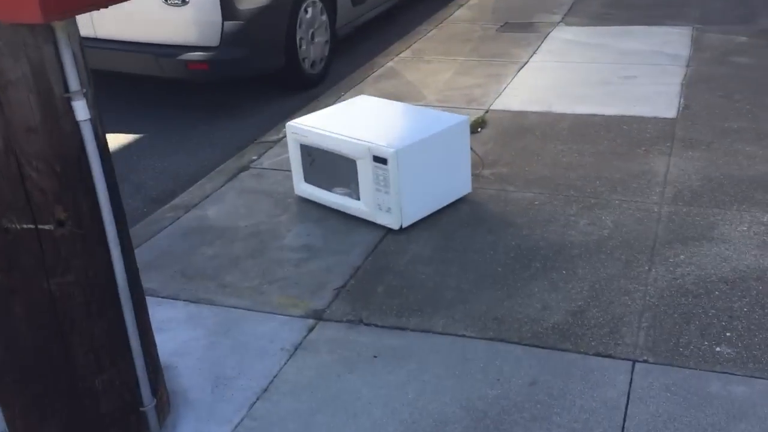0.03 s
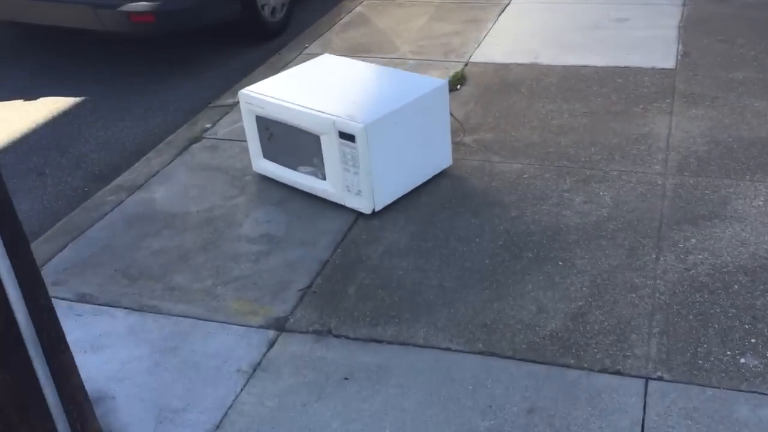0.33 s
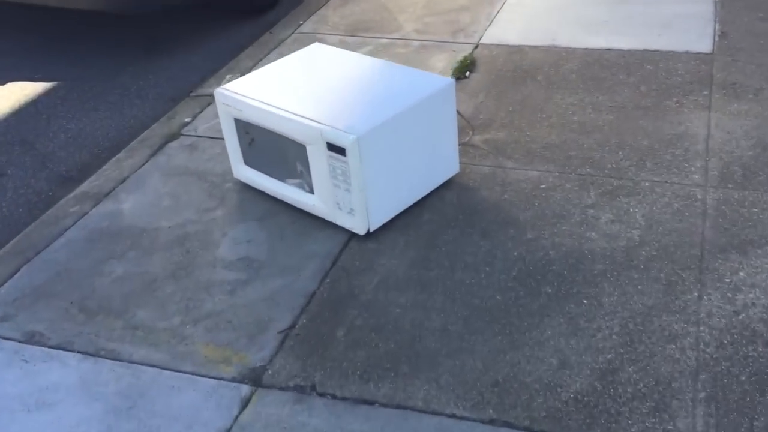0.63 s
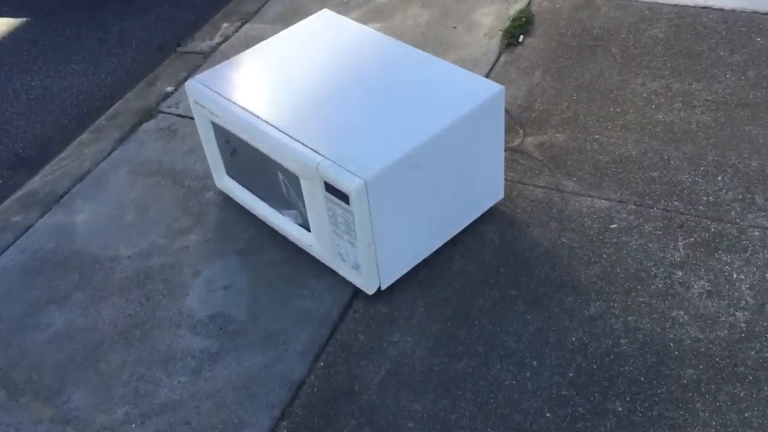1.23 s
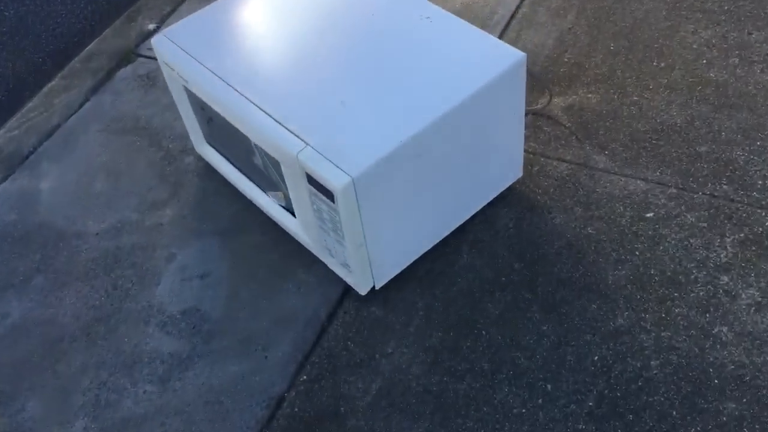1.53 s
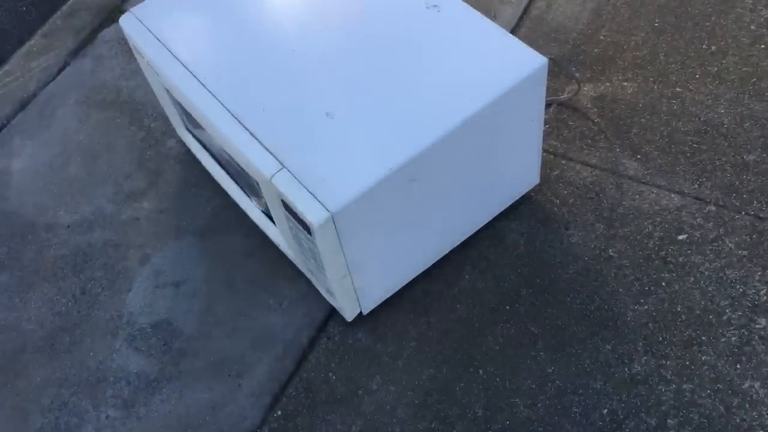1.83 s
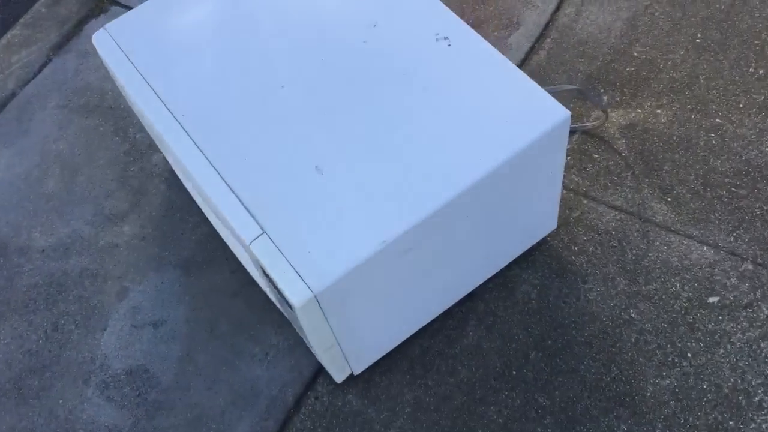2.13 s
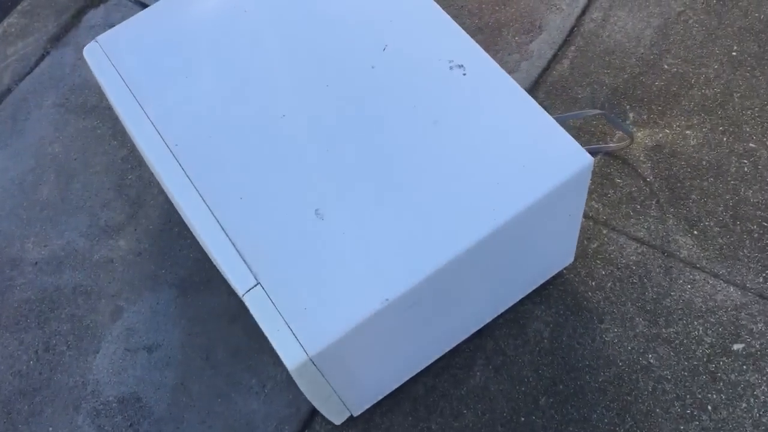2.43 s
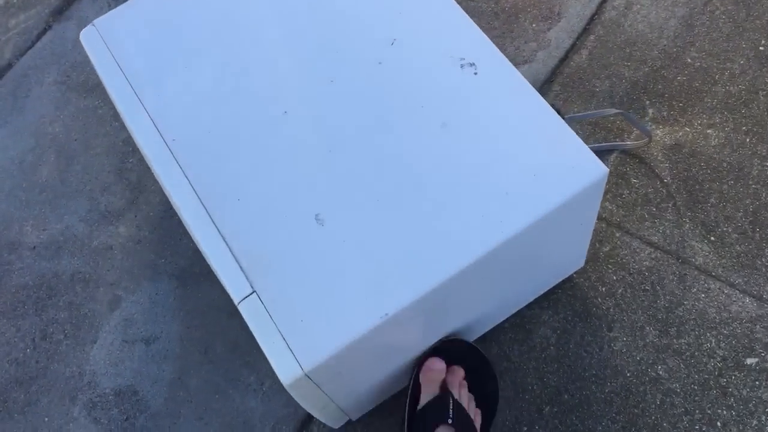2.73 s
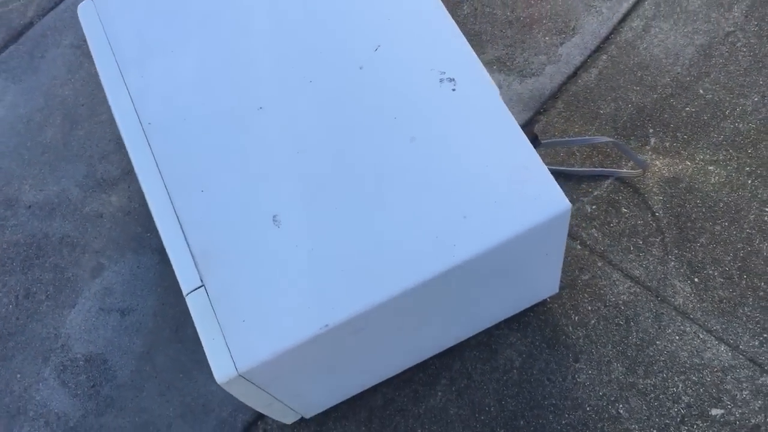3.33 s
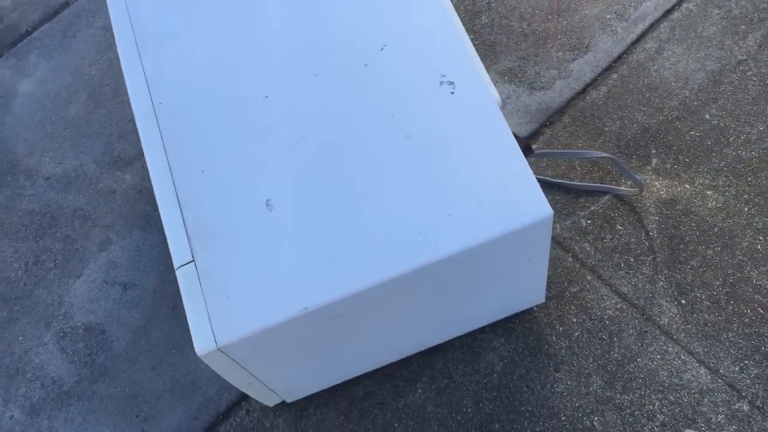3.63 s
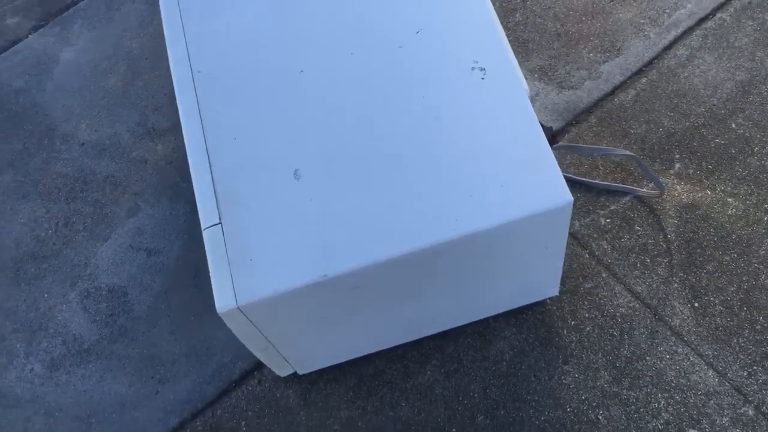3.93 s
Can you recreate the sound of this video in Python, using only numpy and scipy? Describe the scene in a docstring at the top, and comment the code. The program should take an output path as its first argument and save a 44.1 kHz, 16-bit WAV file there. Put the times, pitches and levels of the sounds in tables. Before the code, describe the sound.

Flip-flop footsteps on a sidewalk, then a kick that makes a microwave oven boom and rattle.

```python
"""Flip-flops and a kicked microwave

Someone in flip-flops walks up a concrete sidewalk while distant traffic rumbles. At each step
a rubber sole scuffs the ground and slaps the heel. Then they kick a discarded microwave oven:
its sheet-metal case booms, rattles and is shoved a little way. A few ticks follow, two of
them sharp, likely grit snapping underfoot."""
import sys
import numpy as np
from scipy import signal
from scipy.fft import rfft, irfft
from scipy.io import wavfile

SR = 44100
rng = np.random.default_rng(int(sys.argv[2]) if len(sys.argv) > 2 else 0)


def generate_wav(sig):
    """Save sig (samples, or channels by samples) to the path in sys.argv[1] as 16-bit PCM at SR."""
    pcm = np.round(np.clip(np.atleast_2d(sig).T, -1, 1) * 32767).astype(np.int16)
    wavfile.write(sys.argv[1], SR, pcm)


N = 176400
TIME = np.arange(N) / SR
FREQS_HZ = np.arange(N // 2 + 1) * SR / N


def from_db(db):
    """Turn decibels into a number to multiply by."""
    return 10 ** (np.asarray(db) / 20)


def unit_level(x):
    """Scale a signal so that its average strength (rms) is 1."""
    return x / np.sqrt(np.mean(x ** 2) + 1e-20)


def level(rows):
    """Loudness over time, gliding between rows of time_s, level_db."""
    return from_db(np.interp(TIME, *np.transpose(rows)))


def at_pitch(rows, hz):
    """Look up a pitch in a table, gliding between its rows octave by octave."""
    pitches, values = np.transpose(rows)
    return np.interp(np.log(hz + 1e-9), np.log(pitches), values)


def colour(x, tone, low_hz=0, high_hz=SR):
    """Make some pitches stronger than others and cut off both ends; the result has strength 1."""
    hz = FREQS_HZ + 1e-3
    edges = 1 / np.sqrt((1 + (low_hz / hz) ** 16) * (1 + (hz / high_hz) ** 16))
    return unit_level(irfft(rfft(x) * from_db(at_pitch(tone, hz)) * edges, N))


def grains(per_s=9000, spread_db=3):
    """Tiny random clicks of uneven size."""
    sizes = from_db(spread_db * np.minimum(rng.exponential(1, N), 4)) * rng.choice([-1, 1], N)
    return sizes * (rng.random(N) < per_s / SR)


def clicks(times_s, levels_db):
    """One click for each blow."""
    out = np.zeros(N)
    out[(np.array(times_s) * SR).astype(int)] = from_db(levels_db)
    return out


def ring(force, pitch_hz, fade_s):
    """Each click starts a pure tone. Here and below, fade_s is the time to fall by 60 dB."""
    decay, angle = from_db(-60 / (fade_s * SR)), 2 * np.pi * pitch_hz / SR
    return signal.lfilter([0, np.sin(angle)], [1, -2 * decay * np.cos(angle), decay ** 2], force + 1e-18)


def ring_all(force, tones):
    """A struck object rings with several tones at once, every second one flipped over."""
    return sum((-1) ** k * from_db(db) * ring(force, hz, fade_s)
               for k, (hz, db, fade_s) in enumerate(tones))


def burst(start_s, fade_s, rise_s=1 / SR):
    """Loudness that jumps up and dies away."""
    age = np.maximum(TIME - start_s, 0)
    return (1 - np.exp(-age / rise_s)) * from_db(-60 * np.minimum(age / fade_s, 4))


def wander(position, depth_db=2.6):
    """A gain that drifts to a new random value at each whole number of position."""
    points = rng.standard_normal(int(position[-1]) + 2)
    return from_db(depth_db * np.interp(position, np.arange(len(points)), points))


def uneven(x, spacing_hz=170):
    """No two scrapes are alike: each brings out slightly different pitches."""
    return irfft(rfft(x) * unit_level(wander(FREQS_HZ / spacing_hz)), N)


# Tone of the traffic's rumble, drone and tyre noise: pitch_hz, level_db
RUMBLE_TONE = [(20, -24), (31, -29.5), (44, 0.5), (72, 2.5), (110, 0.5), (165, -9.5), (205, -10),
               (275, -10.5), (330, -22), (420, -27)]
DRONE_TONE = [(330, -6), (450, -3), (560, 4.5), (800, -4.5), (1100, -6.5)]
TYRE_TONE = [(400, -15), (500, -13), (620, -1), (1000, 0.5), (1400, -0.5), (1750, -7), (2100, -12.5),
             (2500, -19), (3100, -23.5), (6000, -26), (15000, -31.5)]
# How loud each one is as time passes: time_s, level_db
RUMBLE_LOUDNESS = [(0, -42.5), (.26, -45), (.33, -49), (.65, -47.5), (.8, -45), (1.0, -44.5), (1.25, -43),
                   (2.0, -44), (2.7, -42.5), (3.3, -41.5), (4, -42.5)]
DRONE_LOUDNESS = [(0, -61), (.5, -62.5), (1.2, -64), (1.9, -63.5), (2.5, -77), (4, -72)]
TYRE_LOUDNESS = [(0, -57.5), (.7, -59), (1.4, -58.5), (2.2, -58.5), (2.7, -58.5), (3.4, -59), (4, -60)]


def traffic(split_hz=400, wavers_per_s=22):
    """Far traffic makes a low rumble, a drone that fades and a wavering wash of tyre noise."""
    rumble = colour(rng.standard_normal(N), RUMBLE_TONE, high_hz=split_hz)
    drone = colour(rng.standard_normal(N), DRONE_TONE, low_hz=305, high_hz=1110)
    spectrum = rfft(rng.standard_normal(N))
    edges_hz = np.geomspace(split_hz, 2600, 25)
    wash = irfft(spectrum * (FREQS_HZ >= edges_hz[-1]), N)  # the highs do not waver
    for low, high in zip(edges_hz, edges_hz[1:]):
        band = irfft(spectrum * ((FREQS_HZ >= low) & (FREQS_HZ < high)), N)
        wash += wander(TIME * wavers_per_s) * band
    tyres = colour(wash, TYRE_TONE)
    return level(RUMBLE_LOUDNESS) * rumble + level(DRONE_LOUDNESS) * drone + level(TYRE_LOUDNESS) * tyres


def street_echo(x, level_db=-20, dull_above_hz=4040):
    """House fronts and parked cars throw back faint, dull echoes."""
    dull = signal.butter(1, dull_above_hz, fs=SR, output="sos")
    echoes = signal.sosfilt(dull, grains(per_s=1500)) * burst(start_s=0.0035, fade_s=0.35)
    return from_db(level_db) * signal.fftconvolve(x, echoes / np.linalg.norm(echoes))[:N]


# Ticks, likely grit snapping underfoot: start_s, high_ring_db, low_ring_db, crunch_db
GRIT_TICKS = [(3.3245, -51, -66, -46), (3.6166, -47, -43.5, -33), (3.6745, -69, -64, -55.5),
              (3.9740, -17, -23.5, -27.5)]
# The high and the lower tones of a tick: pitch_hz, level_db, fade_s
TICK_HIGHS = [(6000, -15, .003), (11900, 2, 0.0025), (13600, -11, .002)]
TICK_LOWS = [(860, -10, .007), (1570, -5.5, 0.017), (2190, -4.5, 0.012), (4600, -4, 0.0048)]
# Tone of the crunch: pitch_hz, level_db
CRUNCH_TONE = [(500, -15), (3000, -6), (6000, 11), (10000, 5), (15500, -12)]


def ticks():
    """Tiny hard snaps ring for an instant and leave a faint spray of crumbs."""
    times_s, high_db, low_db, crunch_db = np.transpose(GRIT_TICKS)
    highs = ring_all(clicks(times_s, high_db), TICK_HIGHS)
    lows = ring_all(clicks(times_s, low_db), TICK_LOWS)
    crunch = 0
    for start_s, db in zip(times_s, crunch_db):
        snap = burst(start_s, fade_s=0.0034, rise_s=0.00022)
        spray = from_db(-26) * burst(start_s, fade_s=0.062)
        crunch += from_db(db) * (snap + spray)
    return highs + lows + crunch * colour(rng.standard_normal(N), CRUNCH_TONE)


# Rubber drags on concrete: peak_s, rise_s, fall_s, judder_db, rasp_db, hiss_db
SOLE_SCUFFS = [(0.027, .015, 0.012, -60, -58, -59.5), (0.058, 0.013, 0.025, -57.5, -65, -61),
               (0.538, 0.006, .016, -57, -56, -56.5), (0.565, .015, 0.061, -65, -72, -69),
               (1.123, 0.023, 0.016, -59, -56, -58.5), (1.152, 0.0075, 0.012, -68, -68, -65),
               (1.198, 0.021, 0.028, -79, -65.5, -68), (1.647, 0.011, 0.015, -45.5, -57, -53.5),
               (1.771, 0.019, 0.024, -72, -57, -70), (1.868, 0.033, 0.027, -68, -68, -73),
               (2.191, 0.0057, 0.014, -43, -52, -53.5), (2.225, 0.062, 0.048, -80, -65.5, -70),
               (2.314, 0.011, 0.015, -70, -61.5, -63), (2.378, 0.037, 0.027, -73, -63, -64.5),
               (2.386, 0.0043, 0.003, -54, -57, -52.5), (3.368, 0.013, 0.013, -62, -66, -66.5),
               (3.675, 0.089, 0.11, -83, -70.5, -95), (3.874, 0.051, .02, -65, -62, -67.5)]
# Tone of the juddering rubber, the sandy rasp and the fine hiss: pitch_hz, level_db
JUDDER_TONE = [(300, -38), (700, -8.5), (1000, -9.5), (1300, -6.5), (1580, 2.5), (2000, -2), (2650, -16.5),
               (3400, -6), (4600, -20), (15500, -43)]
RASP_TONE = [(500, -10), (1800, 5), (2700, -5.5), (3400, -3), (4100, 3), (4900, -7), (6200, -1),
             (8000, -15.5), (15500, -18)]
HISS_TONE = [(500, -25), (3000, -11), (6500, 1), (9300, 2.5), (10500, -7.5), (12500, 2), (15500, -3)]


def scuffs():
    """The sole sticks, slips and rasps over sand grains in short swells."""
    judder = colour(grains(), JUDDER_TONE)
    rasp = colour(grains(per_s=2300, spread_db=4), RASP_TONE)
    hiss = colour(grains(), HISS_TONE)
    out = 0
    for peak_s, rise_s, fall_s, judder_db, rasp_db, hiss_db in SOLE_SCUFFS:
        width_s = np.where(TIME < peak_s, rise_s, fall_s)
        swell = np.exp(-np.minimum(((TIME - peak_s) / width_s) ** 2, 20))
        sand = uneven(from_db(rasp_db) * rasp + from_db(hiss_db) * hiss)
        out += swell * (from_db(judder_db) * judder + sand)
    return out


# Weight lands on the pavement: start_s, level_db
STEP_THUDS = [(1.886, -38.5), (2.207, -30.5), (2.381, -39)]


def thuds():
    """The nearest steps land with a deep thud."""
    return ring(clicks(*np.transpose(STEP_THUDS)), pitch_hz=79, fade_s=0.19)


# A sole slaps the heel: start_s, air_db, air_hz, smack_db, smack_hz, crack_db, again_after_s, again_db
HEEL_SLAPS = [(0.1867, -43, 834, -35, 2400, -45.5, .0082, -2.5),
              (0.7495, -30, 830, -27.5, 1850, -42.5, 0.0042, -13),
              (1.3111, -36.5, 750, -38.5, 2100, -47, .0092, -9),
              (1.8746, -24, 1125, -32.5, 2110, -42, 0.00657, -13),
              (2.3823, -32, 650, -32.5, 1690, -46.5, 0.0032, -14)]
# Tone of the slap's crack: pitch_hz, level_db
SLAP_TONE = [(150, 6), (400, 11), (1000, 7.5), (2500, 0.5), (4000, -6.5), (6500, -11.5), (11000, -24),
             (15500, -24)]


def slaps():
    """Air pops out between heel and sole; the rubber smacks, then touches again more softly."""
    noise = colour(rng.standard_normal(N), SLAP_TONE, low_hz=120)
    out = 0
    for start_s, air_db, air_hz, smack_db, smack_hz, crack_db, again_after_s, again_db in HEEL_SLAPS:
        touches = clicks([start_s, start_s + again_after_s], [0, again_db])
        pop = from_db(air_db) * ring(touches, air_hz, fade_s=0.014)
        smack = from_db(smack_db) * ring(touches, smack_hz, fade_s=0.0063)
        crack = from_db(crack_db) * noise * burst(start_s, fade_s=0.07, rise_s=0.0005)
        out += pop - smack + crack
    return out


# How loud the sliding oven is: time_s, level_db
SHOVE_LOUDNESS = [(3.195, -77), (3.206, -55), (3.222, -46), (3.245, -48), (3.265, -43.5), (3.282, -52),
                  (3.292, -57.5), (3.32, -60), (3.345, -78)]
# Tone of its grinding: pitch_hz, level_db
SHOVE_TONE = [(200, 16.5), (500, -7), (1200, 2.5), (1700, 6.5), (2200, 5.5), (3200, 0), (3800, -6.5),
              (9000, -4.5), (10500, -7.5), (13000, -5), (15500, -9)]


def shove():
    """The oven's feet grind briefly over the concrete."""
    moving = (TIME > SHOVE_LOUDNESS[0][0]) & (TIME < SHOVE_LOUDNESS[-1][0])
    return moving * level(SHOVE_LOUDNESS) * uneven(colour(grains(), SHOVE_TONE, low_hz=120))


# Tone of the loose parts in the case: pitch_hz, level_db
RATTLE_TONE = [(100, 2.5), (200, 8), (285, 14), (370, -2.5), (480, 4), (680, -3), (1000, -1), (2000, 1),
               (2800, -8.5), (6500, -10), (9300, -13.5), (15500, -28)]
# How long they rattle at each pitch: pitch_hz, fade_s
RATTLE_FADES = [(150, 0.67), (300, 0.62), (600, 0.36), (1300, 0.3), (2500, 0.25), (5000, 0.19),
                (15000, 0.2)]


def rattle(start_s, rise_s):
    """Loose parts shake inside the case; the high pitches die away first."""
    parts = colour(grains(per_s=2500), RATTLE_TONE)
    out = 0
    for low_hz in 125 * 2 ** np.arange(7):
        octave = signal.butter(2, [low_hz, 2 * low_hz], "band", fs=SR, output="sos")
        fade_s = at_pitch(RATTLE_FADES, low_hz * np.sqrt(2))
        out += signal.sosfilt(octave, parts) * burst(start_s, fade_s, rise_s)
    return from_db(-27) * out


# The tones of the case's metal panels: pitch_hz, level_db, fade_s
PANEL_TONES = [(87.1, -26.5, 0.22), (127, -29, 0.16), (178, -39, 0.73), (243, -36.5, 0.79), (268, -44, 0.7),
               (297.5, -31, 0.37), (419, -56.5, 0.26), (549, -53, 0.28), (657, -40, 0.18),
               (1003, -52.5, 0.36), (1335, -46, 0.26), (1710, -53, 0.14), (1880, -39.5, 0.14),
               (2131, -37.5, 0.13)]
# Tone of the sole cracking against the case: pitch_hz, level_db
KICK_TONE = [(300, 15.5), (1000, -5), (2000, -2.5), (4000, -1.5), (7000, -4.5), (9300, 3), (10700, -5),
             (13000, 8), (15500, -4)]


def kick(start_s=2.8472, rise_s=0.0011):
    """The toe touches, then the sole cracks against the case: panels boom and loose parts rattle."""
    toe_s = start_s - 0.00492
    boom = ring_all(-clicks([toe_s, start_s], levels_db=[-12, 0]), PANEL_TONES)
    toe = from_db(-43) * burst(toe_s, fade_s=0.04, rise_s=rise_s)
    sole = from_db(-24) * burst(start_s, fade_s=0.034, rise_s=rise_s)
    crack = (toe + sole) * colour(grains(), KICK_TONE)
    return boom + crack + rattle(start_s, rise_s)


def scene():
    """The steps and the oven echo in the street; ticks and traffic join them in one channel."""
    near = slaps() + scuffs() + thuds() + kick() + shove()
    return (near + street_echo(near) + ticks() + traffic())[None]


def record(dry, cutoff_hz=15400):
    """Cut away the very highest pitches."""
    return signal.sosfilt(signal.ellip(12, .1, 80, cutoff_hz, fs=SR, output="sos"), dry)


dry = scene()
out = record(dry)
generate_wav(out)
```